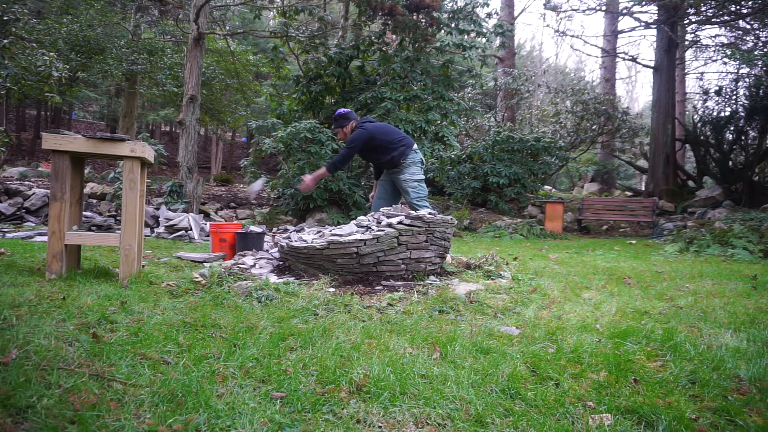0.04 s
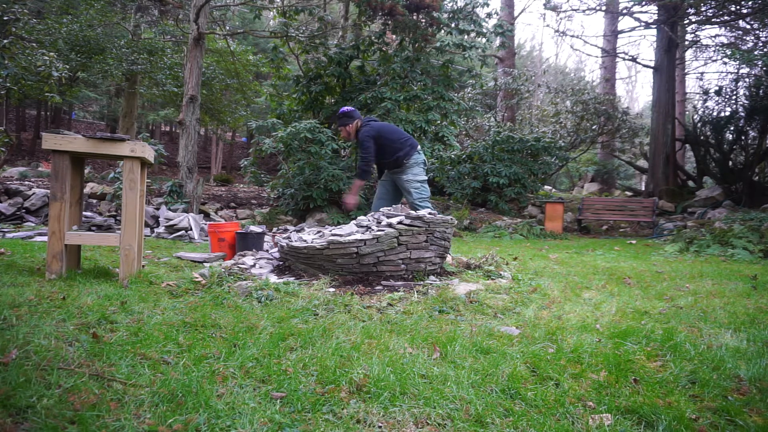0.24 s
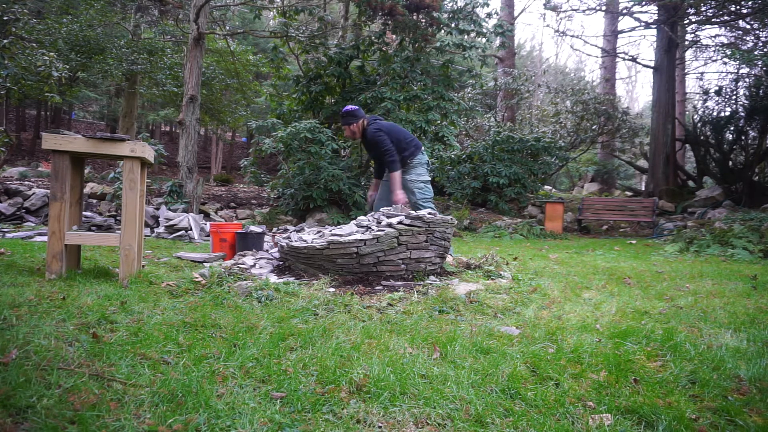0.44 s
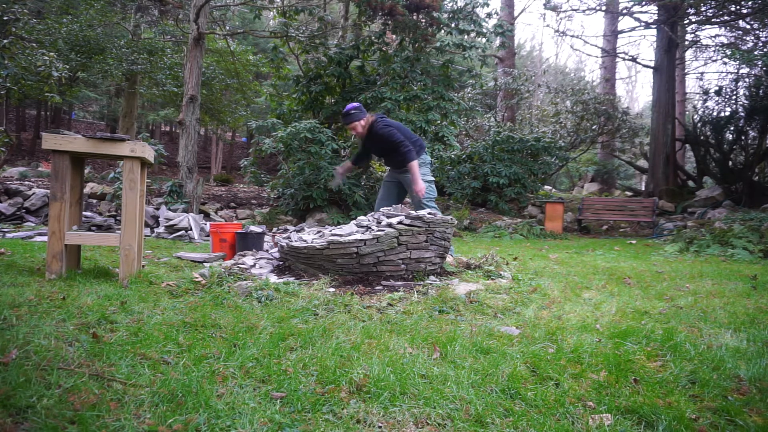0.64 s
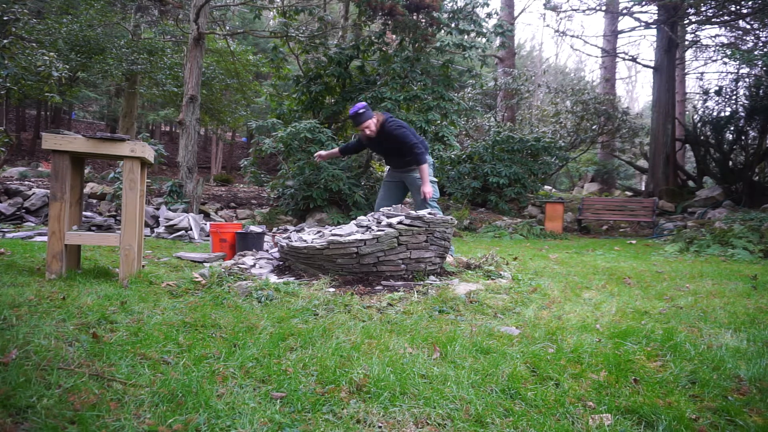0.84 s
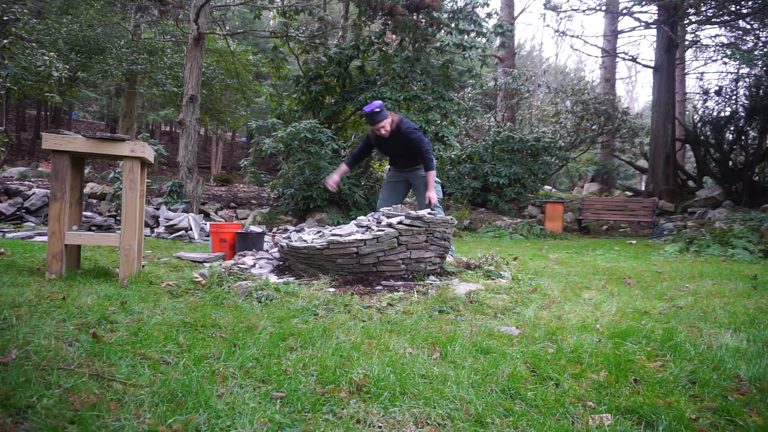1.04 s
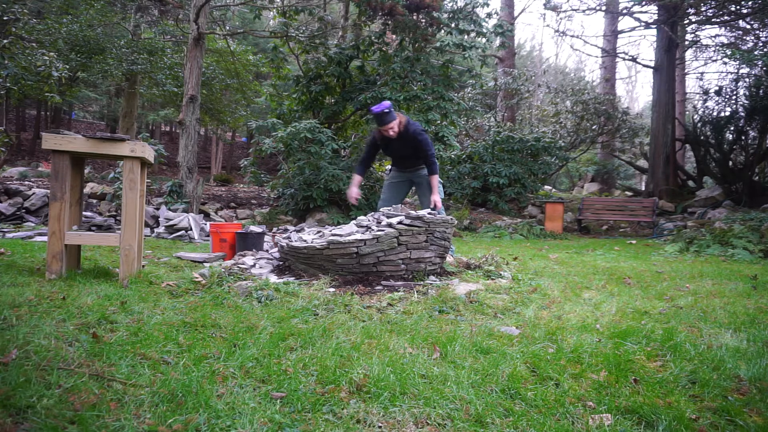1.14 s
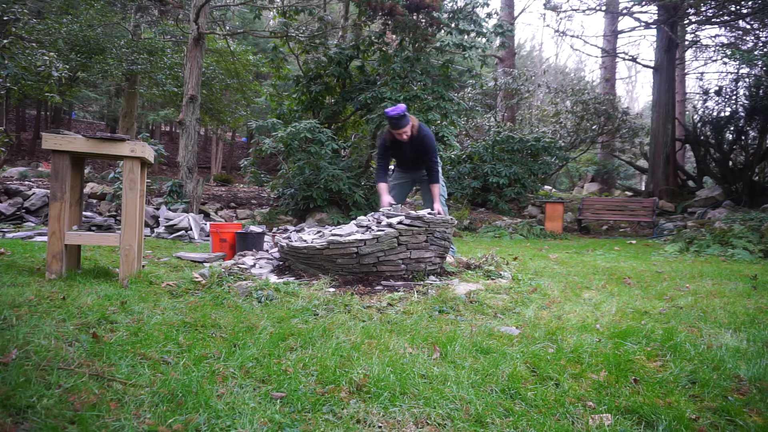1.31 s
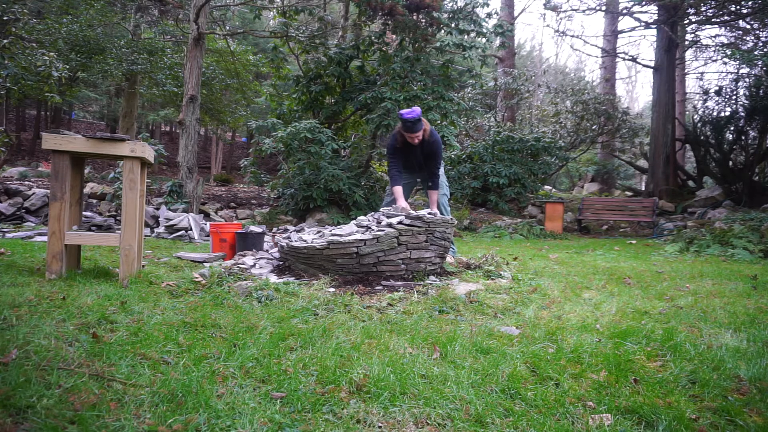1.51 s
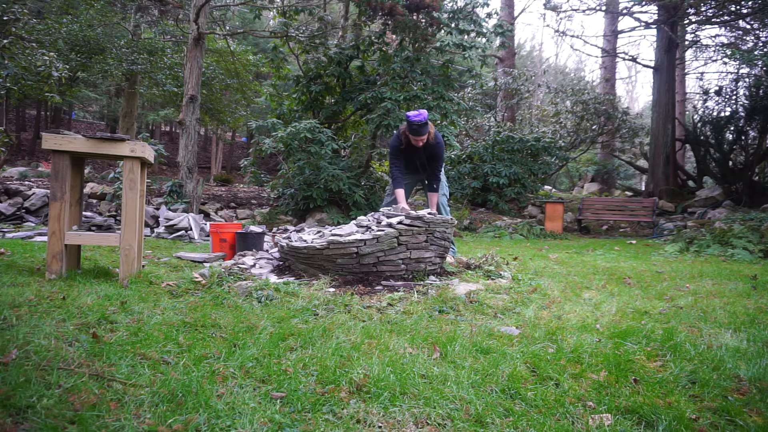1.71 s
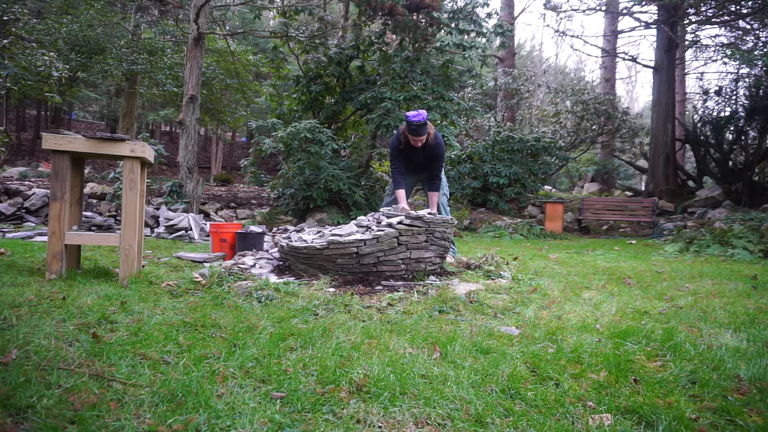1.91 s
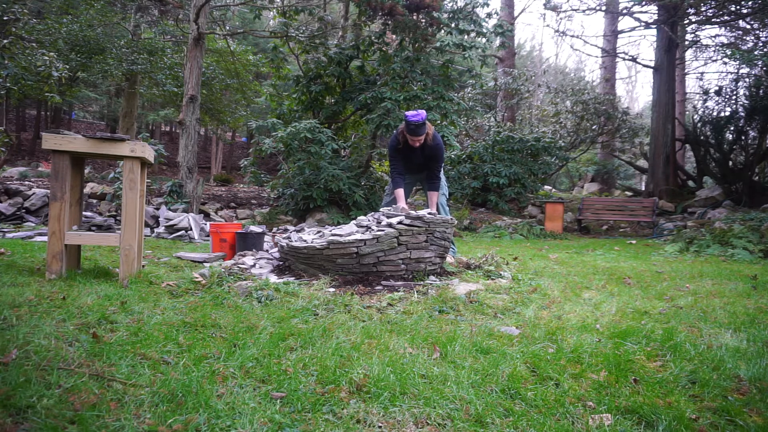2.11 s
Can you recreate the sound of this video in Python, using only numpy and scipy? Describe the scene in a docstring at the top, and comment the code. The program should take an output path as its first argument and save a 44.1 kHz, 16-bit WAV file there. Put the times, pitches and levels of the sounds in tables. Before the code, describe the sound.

Stones tumbling into a plastic bucket, then clacking onto rubble in a quiet yard.

```python
"""A quiet, wooded yard with a dry-stone wall; stones are handled some metres away.
Over a low distant rumble, drone and hum, a handful tumbles into a plastic bucket, whose floor and
wall boom. One stone is tossed onto a rubble pile, bounces and skids; then a slab is nudged and
scraped on the wall. The trees scatter every clack back."""
import sys
import numpy as np
from scipy import signal
from scipy.fft import rfft, irfft, next_fast_len
from scipy.io import wavfile
from scipy.ndimage import uniform_filter1d

SR = 44100
rng = np.random.default_rng(int(sys.argv[2]) if len(sys.argv) > 2 else 0)


def master(y):
    """Save y as 16-bit WAV."""
    cut = np.clip(np.atleast_2d(y).T, -1, 1)
    pcm = np.round(cut * 32767)  # scale
    wavfile.write(sys.argv[1], SR, pcm.astype(np.int16))


N = 94815

# spectra of the contact instant, grit and stone chips: freq_hz, density_db
TICK_SPECTRUM = [(150, -1), (500, -5), (900, -3), (2000, 5.5), (4000, -1.5), (6500, -8), (8500, -16.5),
                 (11500, -13)]
GRIT_SPECTRUM = [(1000, -22), (3000, -2), (4500, 1), (6500, -0.5), (8300, -2), (10000, -7), (11500, -9)]
CHIP_SPECTRUM = [(150, -21), (500, -23), (900, -10), (1250, -19), (1650, 0), (2200, -2), (2800, -1),
                 (3800, -4.5), (5000, -13), (7500, -23.5), (11500, -25.5)]
TICK_T60_S, PILE_PAN_DB = 0.0075, 3.5


def amp(db):
    """Decibels to gain."""
    return 10 ** (np.asarray(db) / 20)


def unit(x):
    """Scale to rms 1."""
    return x / np.sqrt(np.mean(x ** 2) + 1e-20)


def read(points, hz):
    """Interpolate a table over log frequency."""
    freq_hz, value = np.transpose(points)
    return np.interp(np.log(hz + 1), np.log(freq_hz + 1), value)


def level(points):
    """Gain over time from a dB curve, silent outside it."""
    time_s, level_db = np.transpose(points)
    return amp(np.interp(np.arange(N) / SR, time_s, level_db, left=-200, right=-200))


def add(mix, start_s, sound):
    """Mix a sound in at start_s."""
    part = mix[..., round(start_s * SR):][..., :sound.shape[-1]]
    part += sound[..., :part.shape[-1]]


def colour(x, spectrum):
    """Give noise a spectrum, at rms 1."""
    n = x.shape[-1]
    gain = amp(read(spectrum, np.fft.rfftfreq(n, 1 / SR)))
    return unit(irfft(rfft(x) * gain, n))


def diffuse(x):
    """Two unrelated signals to a diffuse field: alike in the bass, apart in the treble."""
    # left-right likeness: freq_hz, coherence
    likeness = [(100, .99), (300, 0.96), (600, 0.73), (1200, 0.34), (2500, 0.17), (5000, 0)]
    n = x.shape[-1]
    a, b = rfft(x)
    coherence = read(likeness, np.fft.rfftfreq(n, 1 / SR))
    mid, side = a * np.sqrt((1 + coherence) / 2), b * np.sqrt((1 - coherence) / 2)
    return irfft(np.array([mid + side, mid - side]), n)


def place(x, pan_db):
    """The nearer side hears a source earlier and, above the bass, louder; positive is left."""
    # level difference as a multiple of pan_db: freq_hz, factor
    pan_factor = [(150, .02), (350, 0.086), (600, 0.51), (1500, 0.7), (5000, 1.2)]
    lead_s_per_db = 22e-6
    n = x.shape[-1]
    padded = next_fast_len(2 * n)
    hz = np.fft.rfftfreq(padded, 1 / SR)
    left = amp(pan_db * read(pan_factor, hz) / 2) * np.exp(1j * np.pi * hz * pan_db * lead_s_per_db)
    return irfft(rfft(x, padded) * np.array([left, 1 / left]), padded)[:, :n]


def burst(t, spectrum, t60_s, spread=0.3, rise_s=0.00025, blow=0):
    """Dying, partly diffuse noise, causally filtered; blow is the share of one clean impulse."""
    noise = rng.standard_normal(len(t)) + spread * diffuse(rng.standard_normal((2, len(t))))
    fade = amp(-60 * t / t60_s) * (1 - np.exp(-t / rise_s))
    puff = np.sqrt(1 - blow) * noise * fade + np.sqrt(blow) * np.linalg.norm(fade) * (t == 0)
    gain = unit(amp(read(spectrum, abs(np.fft.fftfreq(len(t), 1 / SR)))))
    minimum_phase = np.exp(np.conj(signal.hilbert(np.log(gain))))
    return np.fft.ifft(np.fft.fft(puff) * minimum_phase).real


def ring(t, modes):
    """Dying sines; each blow lands elsewhere and weights them a little differently."""
    return sum(amp(db + rng.normal() - 60 * t / t60_s) * np.sin(2 * np.pi * hz * t)
               for hz, db, t60_s in modes)


def grains(spectrum, spread, rate_per_s=3500, size_scale_db=2):
    """Dense tiny contacts of uneven size."""
    size = amp(size_scale_db * np.minimum(rng.exponential(1, (3, N)), 5))
    clicks = size * rng.choice([-1, 1], (3, N)) * (rng.random((3, N)) < rate_per_s / SR)
    return colour(clicks[0] + spread * diffuse(clicks[1:]), spectrum)


def air(rms_db=-44.5, patch_db=2):
    """Distant rumble and air, drifting in patches of time and frequency."""
    # rumble: freq_hz, density_db
    spectrum = [(20, -4.5), (32, -2), (60, -3.5), (84, -4), (100, -5.5), (120, 0), (160, -10), (240, -10),
                (330, -8), (450, -16.5), (650, -17.5), (1000, -15.5), (1600, -24.5), (2500, -34),
                (5000, -39.5), (11500, -40.5)]
    bins = signal.stft(diffuse(rng.standard_normal((2, N))), nperseg=2048)[2]
    drift = uniform_filter1d(rng.standard_normal(bins.shape[1:]), size=10, axis=1)
    patches = unit(uniform_filter1d(drift, size=4, axis=0))
    wash = signal.istft(bins * amp(patch_db * patches), nperseg=2048)[1][:, :N]
    return amp(rms_db) * colour(wash, spectrum)


def drone():
    """A low band of noise swells far away."""
    # swell: time_s, level_db
    swell = [(0, -52), (.9, -61), (1.3, -54), (1.55, -51), (1.72, -45.5), (1.9, -53.5), (2.15, -47)]
    # band: freq_hz, density_db
    spectrum = [(120, -31), (230, -10), (290, -0.5), (350, -4.5), (430, -12), (800, -37)]
    return level(swell) * colour(diffuse(rng.standard_normal((2, N))), spectrum)


def hum(pitch_hz=83.4, wander_hz=3.23, rms_db=-51.5):
    """A faint, wavering hum far off."""
    hz = pitch_hz + wander_hz * unit(uniform_filter1d(rng.standard_normal(N), size=6000))
    return amp(rms_db) * np.sqrt(2) * np.sin(2 * np.pi * np.cumsum(hz) / SR)


def bucket(low_cut_hz=110):
    """Each landing thuds, rings the plastic and cracks against the stones already inside."""
    # landings: start_s, thud_db, floor_db, wall_db, crack_db, grit_db
    landings = [(0.2363, -12.5, -17, -23.5, -21, -29.5), (0.2472, -23, -14.5, -23, -21.5, -33),
                (0.2521, -26, -23, -47, -19, -31), (.2590, -14.5, -15.5, -14.5, -20, -34),
                (.2720, -27, -26, -26, -18.5, -38), (.2895, -17, -47, -39, -24.5, -34),
                (.3035, -17, -39, -10.5, -20.5, -32), (.3495, -18, -25.5, -29, -26.5, -45),
                (0.3717, -26.5, -24, -30, -26, -42), (.4535, -28.5, -28.5, -44, -26, -31.5),
                (0.4938, -28, -28, -34, -24, -37), (0.5142, -34.5, -22.5, -45, -29, -38),
                (0.5471, -42, -44, -42, -30.5, -39.5), (0.5796, -22, -28, -24, -24, -37.5),
                (.5960, -25.5, -19, -42, -44, -37), (0.621, -36, -32.5, -38, -40, -39.5),
                (0.6388, -30, -45, -38, -39.5, -39), (.6740, -25.5, -42, -44, -39, -50),
                (.7400, -35, -44, -62, -49, -63)]
    # bucket modes: pitch_hz, level_db, t60_s
    floor_modes = [(221.6, 0.5, .24), (148, -18, 0.1), (305.5, -11.5, 0.17)]
    wall_modes = [(482.3, -0.5, 0.14), (530, -25, 0.071), (383, -17, 0.13), (698, -14.5, 0.16),
                  (718.5, -18.5, 0.19), (803, -17, .15), (873, -24, .18), (921, -18, 0.21),
                  (1063, -26, .15)]
    # contact spectra: freq_hz, density_db
    thud_spectrum = [(50, -41), (100, -14), (140, -7), (250, -5), (350, -8.5), (500, -2), (620, -18),
                     (900, -14.5), (1500, -35), (4000, -51)]
    crack_spectrum = [(300, -16.5), (700, -9), (1100, -7.5), (1600, 1.5), (2200, -1), (2950, 1), (3700, -7),
                      (6000, -19), (11000, -34)]
    slide_spectrum = [(80, -28), (250, 11), (500, 2.5), (800, -0.5), (1300, -1.5), (2300, -1), (4000, -7.5),
                      (6000, -13), (8500, -13.5), (11500, -21)]
    # small stones clinking: start_s, level_db, pitch_hz, t60_s
    clinks = [(0.2522, -18, 2930, .02), (0.2717, -16.5, 2640, 0.024), (0.372, -22.5, 1510, 0.023),
              (0.5784, -19.5, 4620, .011), (.6380, -29.5, 1620, 0.022)]
    # loose stones sliding between landings: time_s, level_db
    slide = [(.235, -51), (.245, -30), (.32, -29.5), (.39, -34.5), (.44, -36), (.46, -33), (.495, -27.5),
             (.53, -34), (.568, -41), (.59, -37.5), (.645, -42.5), (.69, -65), (.78, -84)]
    out, t = np.zeros((2, N)), np.arange(12288) / SR
    boom_rise = 1 - np.exp(-t / 0.0017)
    for start_s, thud_db, floor_db, wall_db, crack_db, grit_db in landings:
        boom = (amp(floor_db) * ring(t, floor_modes) + amp(wall_db) * ring(t, wall_modes)) * boom_rise
        thud = amp(thud_db) * burst(t, thud_spectrum, t60_s=0.068, spread=0.28, rise_s=0.0011, blow=0.29)
        crack = amp(crack_db) * burst(t, crack_spectrum, t60_s=0.047, spread=0.38, rise_s=0.00074)
        snap = amp(grit_db + 5) * burst(t, TICK_SPECTRUM, TICK_T60_S)
        grit = amp(grit_db) * burst(t, GRIT_SPECTRUM, t60_s=0.055, spread=0.8, rise_s=0.00067)
        add(out, start_s, boom + thud + crack + snap + grit)
    for start_s, level_db, pitch_hz, t60_s in clinks:
        add(out, start_s, ring(t, [(pitch_hz, level_db, t60_s)]))
    out += level(slide) * grains(slide_spectrum, spread=0.9)
    low_cut = signal.butter(2, low_cut_hz, "high", fs=SR, output="sos")
    return place(signal.sosfilt(low_cut, out), pan_db=4.5)


def clacks(hard_blow_db=-14, brighten_db_per_db=0.56):
    """Stone on stone: a tick, a few cycles that swell and die, a rattle of jostled chips."""
    # strikes: start_s, level_db, pitch_hz, swell_steps, pan_db
    strikes = [(1.1444, -15.5, 1530, 0.68, 4), (1.1520, -16, 1720, 0.91, 3.5),
               (1.1555, -9, 2150, 0.46, 5.5), (1.1592, -21.5, 1910, .8, 8.5), (1.1855, -22, 2420, 0.88, 0),
               (1.2180, -7.5, 2000, 0.52, 5), (1.2365, -20, 1950, 1, -11), (1.2440, -26, 2150, 2.2, 2),
               (1.2482, -17, 2060, 1.1, -1.5), (1.2766, -27, 1760, 0.75, -6), (1.2850, -14, 1890, 0.42, -1),
               (1.5553, -27.5, 1700, 0.73, 6.5), (1.5558, -32, 2630, 1.07, 5),
               (1.6620, -36.5, 1750, 0.76, 6), (1.6710, -37.5, 1370, 1.3, 11), (1.9170, -36, 2360, 0.8, -3),
               (1.9770, -31.5, 2370, 0.87, -2.5), (2.015, -34, 2440, 0.51, 2),
               (2.0470, -25, 1690, 0.48, -3), (2.0476, -29, 2540, 1.7, -1), (2.074, -30, 1610, 0.85, -2),
               (2.1030, -29, 1950, 0.9, -3)]
    swell_step_s = 0.00099
    out, t = np.zeros((2, N)), np.arange(8192) / SR
    for start_s, level_db, pitch_hz, swell_steps, pan_db in strikes:
        age = t / (swell_steps * swell_step_s)
        envelope = age * np.exp((1 - age ** 2) / 2)  # peaks at age 1
        phase = 2 * np.pi * pitch_hz * t
        tone = np.sin(phase) + amp(-13.5) * np.sin(0.49 * phase) + amp(-25) * np.sin(3.01 * phase)
        chips = amp(-23) * burst(t, CHIP_SPECTRUM, t60_s=0.067, spread=0.91)
        tick_db = -15 + brighten_db_per_db * (level_db - hard_blow_db)  # harder is brighter
        tick = amp(tick_db) * burst(t, TICK_SPECTRUM, TICK_T60_S)
        add(out, start_s, place(amp(level_db) * (envelope * tone + tick + chips), pan_db))
    return out


def pile_thuds():
    """The tossed stone's weight pushes dully into the pile."""
    # pushes: start_s, level_db, t60_s
    pushes = [(1.1446, -28.5, 0.086), (1.1560, -33.5, 0.07)]
    # dull push: freq_hz, density_db
    spectrum = [(60, -16), (150, 1.5), (300, -12), (600, -4), (850, 5), (1200, -3), (2500, -2), (6000, -36)]
    out, t = np.zeros((2, N)), np.arange(8192) / SR
    for start_s, level_db, t60_s in pushes:
        add(out, start_s, place(amp(level_db) * burst(t, spectrum, t60_s), PILE_PAN_DB))
    return out


def rubble():
    """Small stones settle, the tossed stone skids to rest, grit scuffs now and then."""
    # settling and skidding: time_s, level_db
    settle = [(1.145, -61), (1.16, -34), (1.185, -30), (1.21, -40.5), (1.25, -34), (1.295, -40.5),
              (1.318, -39.5), (1.36, -72), (1.45, -65)]
    skid = [(1.285, -60), (1.303, -38), (1.318, -36.5), (1.338, -43), (1.36, -63)]
    # skid: freq_hz, density_db
    skid_spectrum = [(1000, -31), (2000, -4), (2700, -9), (3300, 3), (4100, 1), (4900, -12.5), (6200, -10),
                     (8000, -26), (11500, -30)]
    # gritty scuffs: start_s, length_s, level_db
    scuffs = [(1.167, 0.061, -44), (1.233, .025, -42), (1.44, .04, -53.5), (1.559, 0.082, -52.5),
              (1.668, 0.063, -51.5), (2.098, .015, -44), (2.115, 0.027, -45)]
    scuff_gain = np.zeros(N)
    for start_s, length_s, level_db in scuffs:
        progress = np.clip((np.arange(N) / SR - start_s) / length_s, 0, 1)
        scuff_gain += amp(level_db) * np.sin(np.pi * np.sqrt(progress))
    settling = level(settle) * grains(CHIP_SPECTRUM, spread=0.92)
    skidding = level(skid) * grains(skid_spectrum, spread=1.2)
    scuffing = scuff_gain * grains(GRIT_SPECTRUM, spread=1.6)
    return place(settling + skidding + scuffing, PILE_PAN_DB)


def slab(catch_db=2):
    """A flat stone grinds over the top of the wall, catching and slipping."""
    # scrape: time_s, level_db
    scrape = [(1.75, -64), (1.83, -52), (1.89, -47), (1.925, -39.5), (1.958, -44), (1.977, -41.5),
              (2.0, -44), (2.05, -40), (2.09, -43), (2.108, -43), (2.15, -45)]
    # grinding: freq_hz, density_db
    spectrum = [(120, -26), (300, -2), (480, -1.5), (600, -3.5), (800, 2), (1100, -2), (1600, 3.5),
                (2050, -4), (2480, 1), (2900, -6.5), (4000, -8), (5500, -12.5), (11500, -21)]
    catch = amp(catch_db * unit(uniform_filter1d(rng.standard_normal(N), size=500)))
    return place(level(scrape) * catch * grains(spectrum, spread=0.42), pan_db=-1)


def yard(x, wet_db, side_db=0, build_s=0.021):
    """Add echoes scattered by trunks and leaves; positive side_db favours the left."""
    # echo decay: freq_hz, t60_s
    decay = [(150, 0.49), (600, 0.59), (2000, 0.76), (4500, 0.48), (10000, 0.49)]
    # echo colour: freq_hz, gain_db
    echo_colour = [(100, 6), (500, -7), (1200, 0), (2000, -4.5), (3500, -3), (10000, 1.5)]
    taps = diffuse(rng.standard_normal((2, SR)) * (rng.random((2, SR)) < 0.1))
    hz, t, bins = signal.stft(taps, SR, nperseg=256)
    fade = amp(-60 * t / read(decay, hz)[:, None])
    build = 1 - np.exp(-(t / build_s) ** 2)
    tail = signal.istft(bins * fade * build, SR, nperseg=256)[1]
    gain = amp(read(echo_colour, np.fft.rfftfreq(tail.shape[1], 1 / SR)))
    tail = irfft(rfft(tail / np.linalg.norm(tail[0])) * gain)
    echoes = signal.fftconvolve(x[:1], tail[:, :int(0.75 * SR)], axes=1)[:, :N]
    return x + amp([[wet_db + side_db / 2], [wet_db - side_db / 2]]) * echoes


def scene():
    """Bucket, pile and wall echo in the yard over the distant background."""
    tumble = yard(bucket(), wet_db=-11, side_db=0.3)
    stones = yard(clacks() + pile_thuds() + rubble(), wet_db=-5)
    scrape = yard(slab(), wet_db=-6, side_db=-5)
    return air() + drone() + hum() + tumble + stones + scrape


def record(dry):
    """Steep low-pass band limit."""
    edge_hz = 11130
    low_pass = signal.firwin(255, edge_hz, window=("kaiser", 7), fs=SR)
    return signal.oaconvolve(dry, low_pass[None], "same")


dry = scene()
out = record(dry)
master(out)
```